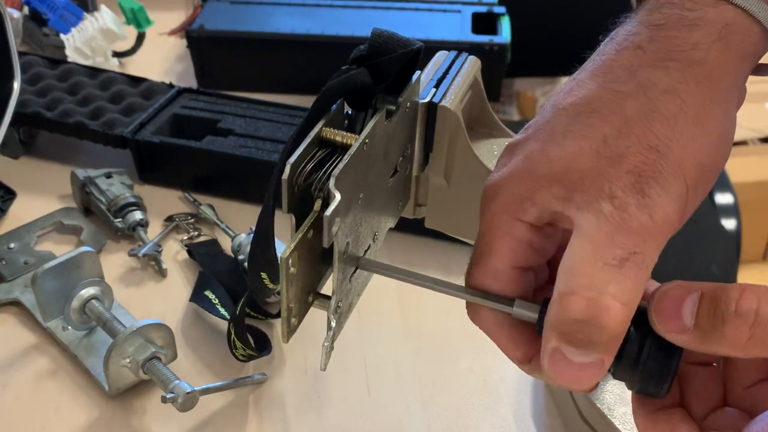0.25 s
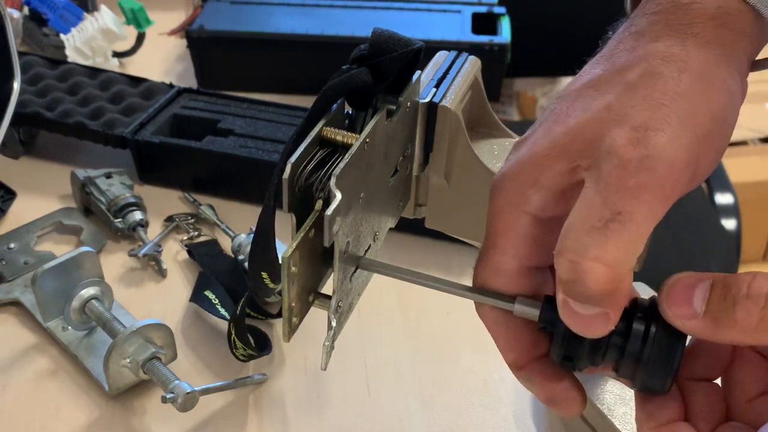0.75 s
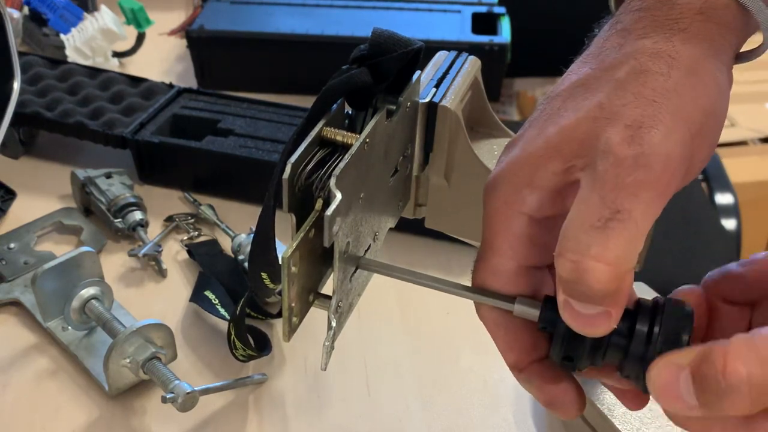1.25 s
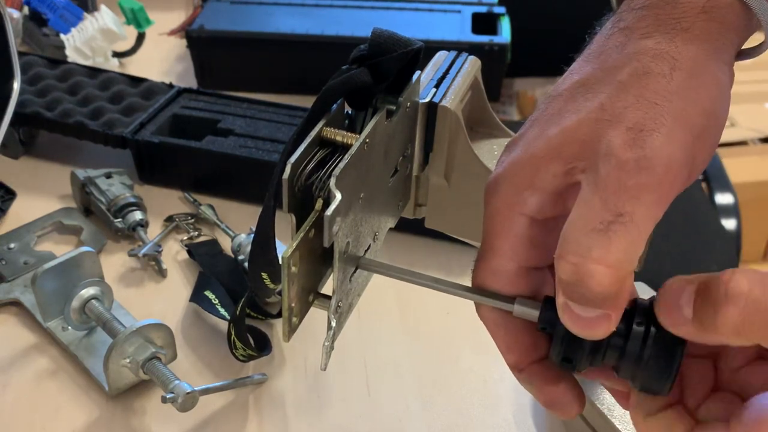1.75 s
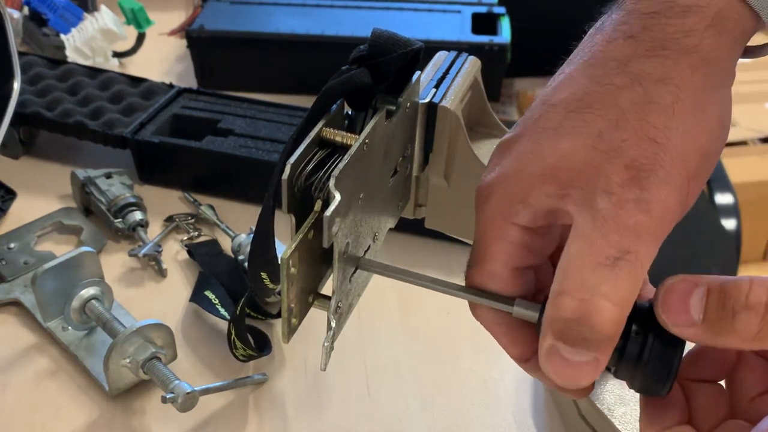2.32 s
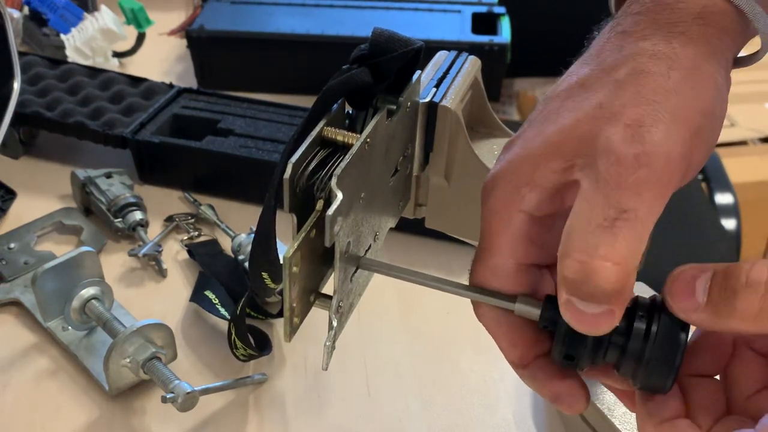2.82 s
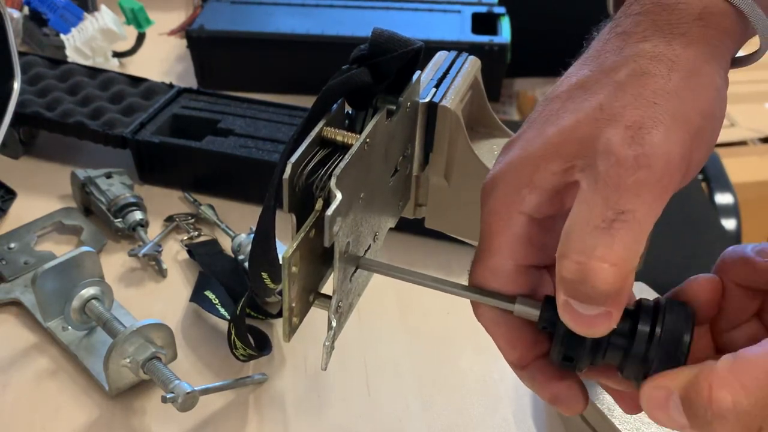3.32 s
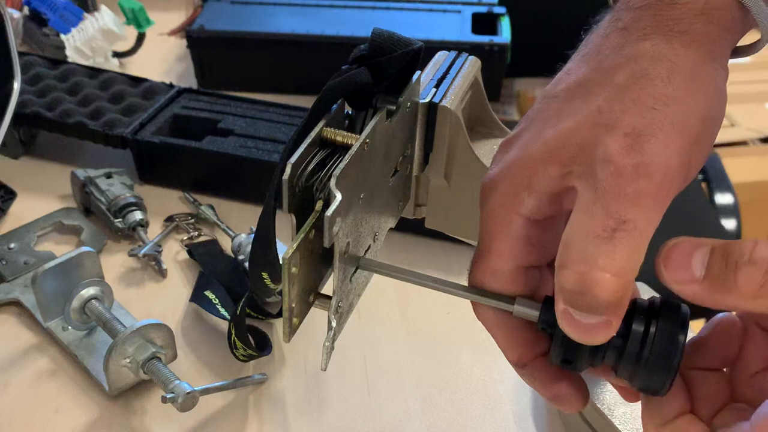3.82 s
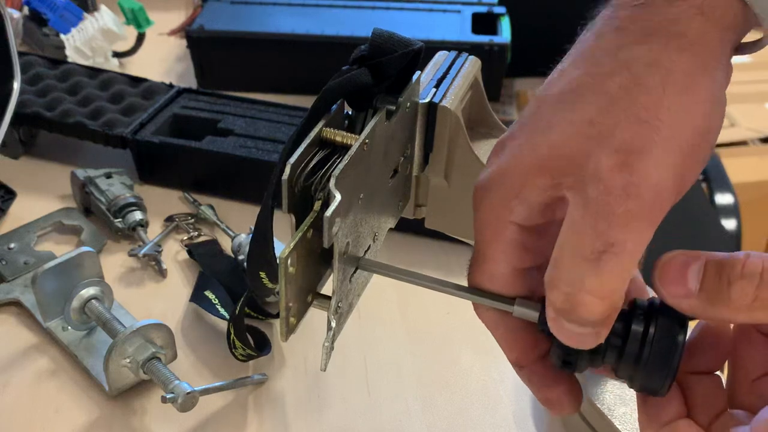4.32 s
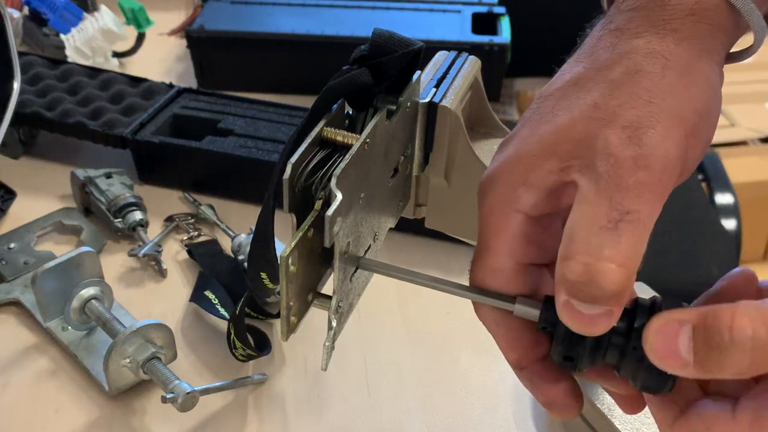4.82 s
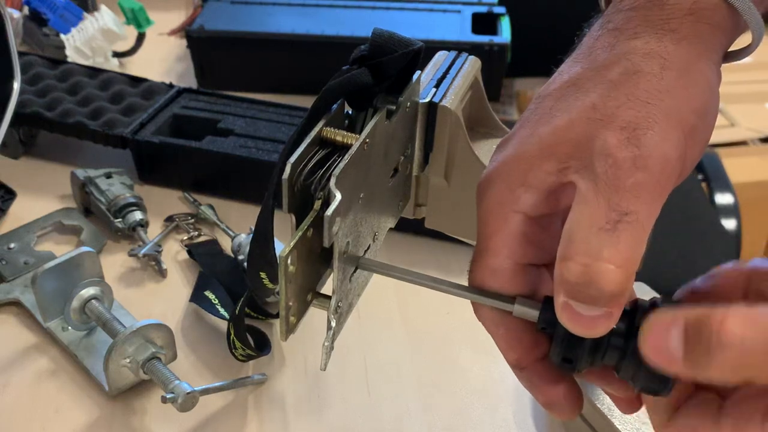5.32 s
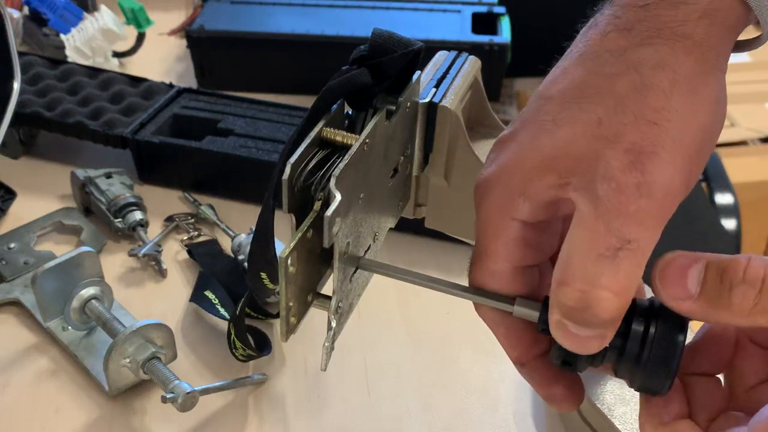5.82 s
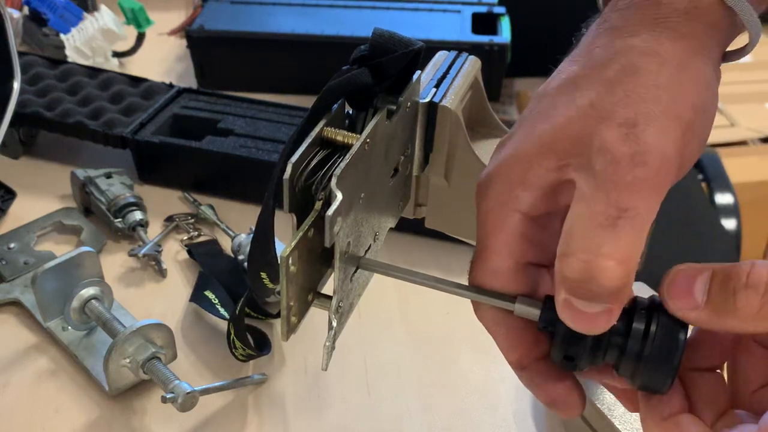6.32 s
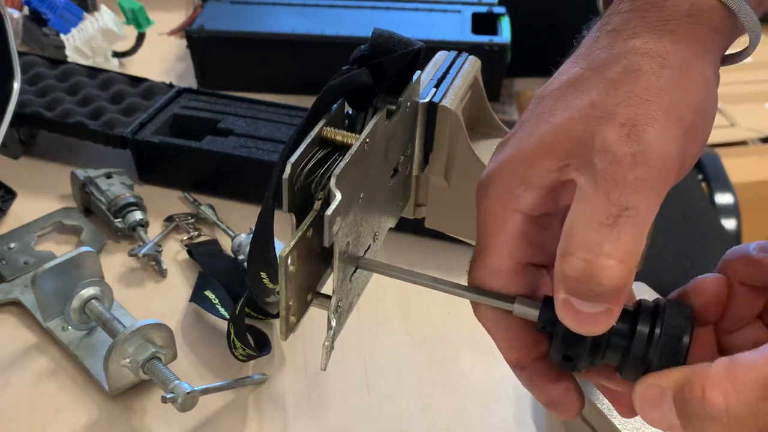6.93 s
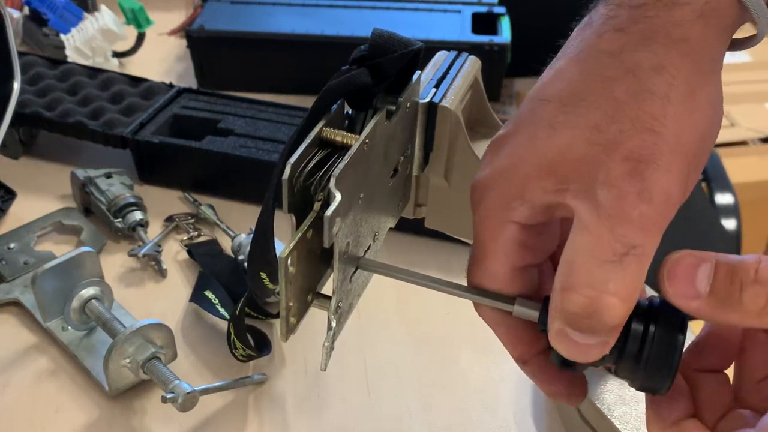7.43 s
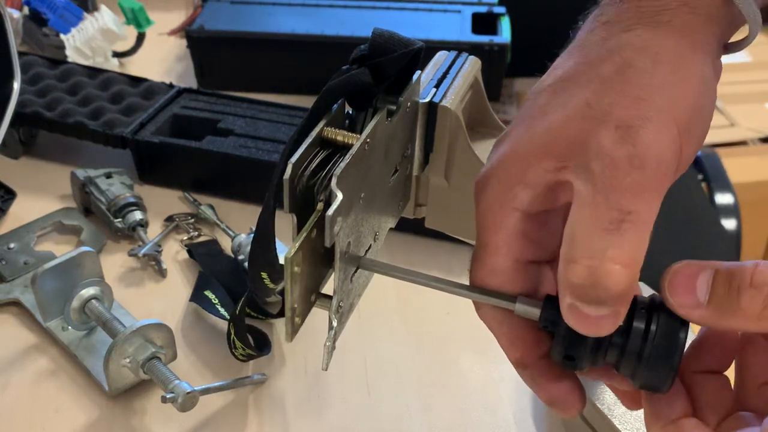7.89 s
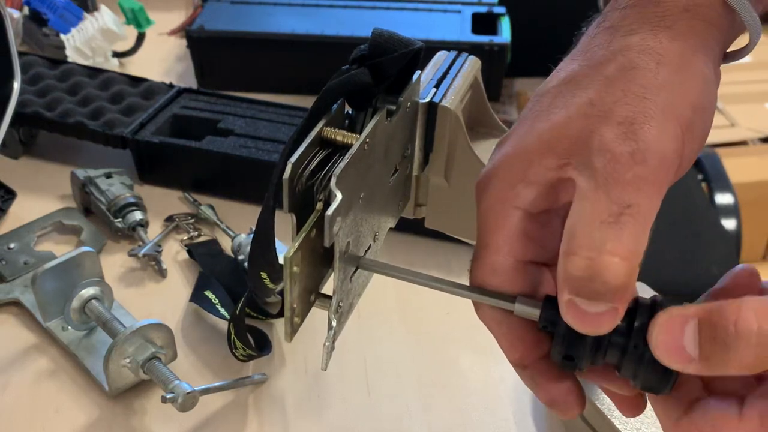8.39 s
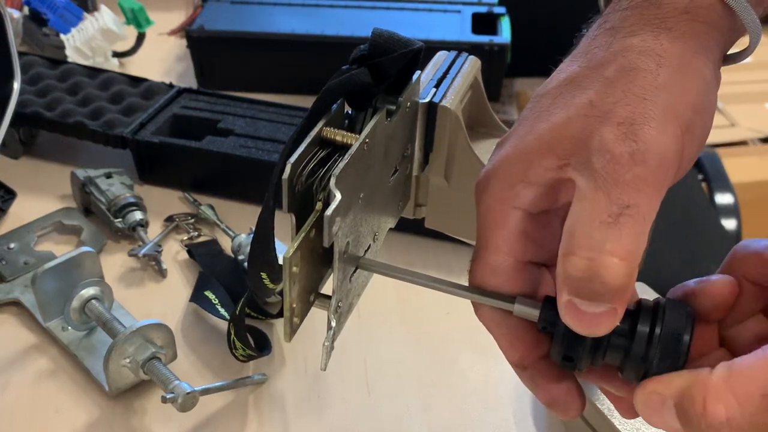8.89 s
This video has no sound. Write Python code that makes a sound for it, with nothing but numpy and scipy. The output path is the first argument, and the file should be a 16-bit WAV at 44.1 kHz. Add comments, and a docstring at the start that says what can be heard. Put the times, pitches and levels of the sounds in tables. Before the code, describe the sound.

A steel pick works a lever lock on a wooden bench, heard up close. A short scrape and a double snap open it, then soft clicks, small slides and faint finger ticks on a plastic knob fall between sharper, briefly ringing snaps. The hardest snap comes near the middle, and a soft click ends it. The bench thuds lightly under the snaps, in a quiet room with low rumble and hiss.

```python
"""A steel pick works a lever safe lock that stands open on a wooden bench, close to a two-port microphone.
It opens on a short scrape and a double snap of levers on steel and brass plates; the bench booms below.
Fingers tick and rub on the pick's knob between soft clicks and slides, then levers snap at 2.2-2.4 s.
The hardest snap lands at 4.1 s, more follow at 4.4, 5.8 and 7.6-7.9 s, and a soft click ends it at 9.1 s.
Throughout, the quiet room answers each click over a low rumble and microphone hiss."""
import sys
import numpy as np
from scipy import signal
from scipy.fft import rfft, irfft, next_fast_len
from scipy.io import wavfile

SR = 44100
rng = np.random.default_rng(int(sys.argv[2]) if len(sys.argv) > 2 else 0)


def generate_wav(sig):
    """Save sig (samples, or channels by samples) to the path in sys.argv[1] as 16-bit PCM at SR."""
    pcm = np.round(np.clip(np.atleast_2d(sig).T, -1, 1) * 32767).astype(np.int16)
    wavfile.write(sys.argv[1], SR, pcm)


N = 403515

# Metal contacts: (time [s], level at 2.8 kHz [dB], clack at 1.6 kHz [dB re level], edge at 7 kHz [dB re level],
# top at 13 kHz [dB re level], weight into the bench [dB], plate struck squarely [Hz; 0 for none, 1 or less
# wakes only the lowest plate's ring], its boost [dB])
CONTACTS = [(0.2315, -35.5, -14, -1.5, -2.5, -49.5, 529.5, 11), (0.2356, -27, -14, -7, 2, -42, 2861, 1.5),
            (0.5626, -43.5, -1, -3, -15, -44, 1250, 6.5), (1.708, -56, -3, -19, -20, -56.5, 1900, 9.5),
            (1.7233, -52.5, -5, -0.5, -26, -55.5, 4950, 8), (1.7482, -56, 2, 11, -35, -54, 7600, 7),
            (1.768, -46.5, -13, -20, -33, -51, 4550, 0), (2.1967, -22, -27.5, -1, 0, -34.5, 2669.5, 3),
            (2.404, -28.5, -8.5, -1, 6, -49, 0, 0), (2.4295, -30, -10.5, 1.5, 7, -38, 1900, 5.5),
            (2.621, -46.5, -0.5, -5, -34, -46, 921, 5), (3.633, -57, 7.5, -16, -27, -59.5, 1, -0.5),
            (3.6617, -53, 1, 4, -23, -48.5, 4130, 14), (3.6736, -49.5, -11, 4, -10, -53, 5500, 2),
            (3.7483, -50.5, 3, 5.5, 1.5, -50.5, 1700, 3), (4.0693, -33, 0, -2.5, -5.5, -60.5, 1699.5, 4),
            (4.076, -17.5, -14, -3, 0.5, -35, 681.5, 5.5),
            (4.4202, -27.5, -10.5, -8, -13.5, -36, 3100, 9.5), (5.3519, -61, -1, -26, -34.5, -58.5, 0, -1),
            (5.3653, -57.5, 3, -26, -27, -53, 0, 0), (5.4092, -44.5, -4, -2, -11, -57.5, 4950, 7.5),
            (5.81, -30.5, -5.5, 2, 14.5, -38, 0.5, 0.5), (6.0454, -51.5, -11, -8, -28, -47, 2670, 2),
            (6.2322, -47.5, 1.5, 2, -13.5, -43, 1700, 4.5), (7.056, -55.5, -1, -12.5, -22, -51, 1, 0),
            (7.091, -55, -5, 4.5, -20, -48.5, 4550, 3), (7.564, -21, -15.5, 0.5, 3, -35, 2669.5, 4.5),
            (7.5893, -32, -14.5, 0.5, 9, -36.5, 4551.5, 5), (7.868, -45.5, -12, -3, -9, -51, 1250, 18),
            (7.879, -35.5, -1.5, -2, -8, -36, 2670, 2), (9.0748, -54, 4.5, -10, -21.5, -48.5, 0, -1)]
# Tone of steel sliding on steel: (frequency [Hz], level per half octave [dB])
SCRAPE_TONE = [(300, -10.5), (700, -24), (2000, -22), (4000, -20.5), (8000, -30), (14000, -29)]
# Decay of the room: (frequency [Hz], t60 [s])
ROOM_DECAY = [(150, 0.68), (560, 0.24), (1470, 0.29), (3880, .33), (8000, 0.29), (14000, 0.15)]
BAND_EDGES_HZ = 300 * 2 ** np.arange(0, 6.1, .5)
BAND_CENTRES_HZ = np.sqrt(BAND_EDGES_HZ[1:] * BAND_EDGES_HZ[:-1])
CHATTER_S, LOCK_PAN_DB = .0008, .76   # time scale of a contact; left minus right


def amp(db):
    """Decibels to gain."""
    return 10 ** (np.asarray(db) / 20)


def pan(db):
    """Left and right gains, with the left louder by db."""
    return amp(db * np.array([[.5], [-.5]]))


def rms_one(x):
    """Scale to rms 1."""
    return x / np.sqrt(np.mean(x ** 2) + 1e-20)


def at_hz(points, hz):
    """Read a (frequency, value) curve on a log axis."""
    return np.interp(np.log(hz + 1), np.log(np.array(points)[:, 0] + 1), np.array(points)[:, 1])


def band(x, k):
    """Half-octave band k of x, at rms 1."""
    sos = signal.butter(2, BAND_EDGES_HZ[k:k + 2], "band", fs=SR, output="sos")
    return rms_one(signal.sosfilt(sos, x))


def ring(force, hz, t60):
    """One resonance: a unit click starts a decaying sine of height 1."""
    r, w = amp(-60 / (max(t60, .003) * SR)), 2 * np.pi * hz / SR
    return signal.lfilter([0, np.sin(w)], [1, -2 * r * np.cos(w), r * r], force + 1e-18)


def stereo(mid, side):
    """Mid and side to left and right."""
    return np.array([mid + side, mid - side])


def blow_db(hz):
    """Level of every contact at one pitch: weight sets the knock, a squarely struck plate stands out."""
    anchors_hz, levels = [700, 1600, 2800, 7000, 13000], []
    for _, db, clack, edge, top, weight, plate_hz, boost_db in CONTACTS:
        tone = list(zip(anchors_hz, [weight - 10.5, db + clack, db, db + edge, db + top]))
        octaves_off = np.log2(hz / max(plate_hz, 1))
        levels.append(at_hz(tone, hz) + .51 * boost_db * np.exp(-(octaves_off / .087) ** 2))
    return np.array(levels)


def lever_ring():
    """Each contact is a short chatter that strikes every mode of the lock at a moment of its own."""
    # Modes of the plates and levers: (frequency [Hz], level [dB], t60 [s])
    modes = [(720, -23, .03), (1140, -23, .03), (1840, -11.5, .04), (1800, -12, 0.028), (2265, -17, 0.027),
             (2720, -4.5, 0.019), (2810, -4.5, 0.041), (3299, -9.5, 0.028), (4600, -13.5, .03),
             (4910, -9, 0.019), (5300, -12, 0.07), (6440, -19.5, 0.0067), (6770, -8, 0.028),
             (8050, -10, 0.017), (7530, -3.5, 0.025), (8350, 2.5, 0.026), (9490, 0.5, 0.019),
             (9200, -1.5, 0.06), (11600, -1.5, 0.013), (11260, -1.5, 0.02), (12700, -10, 0.039),
             (12750, -6.5, 0.03), (13900, -11, 0.013), (14750, 1.5, .02), (15100, -9, .012)]
    hz, db, t60 = np.transpose(modes)[:, :, None]
    delays = CHATTER_S * rng.gamma(2, .7, (len(CONTACTS), len(modes)))
    scatter_db = rng.normal(0, 1, delays.shape)
    gains = amp(np.transpose([blow_db(f) for f in hz[:, 0]]) + db[:, 0] - 2.5 + scatter_db)
    out = np.zeros((2, N))
    for (time, *_), delay, gain in zip(CONTACTS, delays, gains):
        t = np.maximum(np.arange(2600) / SR - delay[:, None], 0)
        partials = amp(-60 * t / t60) * np.sin(2 * np.pi * hz * t)
        i = round(time * SR)
        out[:, i:i + t.shape[1]] += pan(LOCK_PAN_DB) * (gain @ partials)
    return out


def lever_crack():
    """A faint swell of noise leads into each sharp crack, which lasts longer below 2.8 kHz."""
    # Tone of the blow, too dense for single modes: (frequency [Hz], level [dB])
    crack_tone = [(400, -12.5), (700, -9.5), (1500, -9), (2700, -9), (4000, -17.5), (8000, -2.5),
                  (10400, -12), (13500, -7), (16500, -14)]
    lead_samples = 900
    t = np.arange(-lead_samples, 400) / SR
    lead_in_swell = amp(-18) * np.exp(-np.abs(t) / .0035)
    out, white = np.zeros(N), rng.standard_normal((2, N))
    for k, hz in enumerate(BAND_CENTRES_HZ):
        age = np.maximum(t, 0) / (CHATTER_S * np.sqrt(max(2800 / hz, 1)))
        snap = age * np.exp(1 - age)
        envelope = np.zeros(N)
        for (time, *_), gain in zip(CONTACTS, amp(blow_db(hz) + at_hz(crack_tone, hz))):
            i = round(time * SR) - lead_samples
            envelope[i:i + len(t)] += gain * (lead_in_swell + snap)
        out += envelope * band(white[k % 2], k)
    return pan(LOCK_PAN_DB) * out


def slide_envelopes():
    """Scrape and bench shake: each slide sets in fast, grows under load until the pick seats, then fades."""
    # Slides of the pick: (end [s], length [s], scrape [dB], bench shake [dB])
    slides = [(0.004, 0.053, -51.5, -49), (0.561, .014, -63, -60.5), (1.771, 0.072, -60.5, -48.5),
              (2.404, .012, -60, -61), (3.674, .045, -56.5, -47.5), (3.748, .012, -60.5, -50.5),
              (4.416, .012, -58, -70), (5.412, 0.037, -55, -44), (6.238, .012, -60, -62),
              (7.085, 0.031, -53, -44), (7.866, .012, -59.5, -62), (9.092, 0.023, -54, -43)]
    onset, growth, scrape_fade, shake_fade = 1200, 65, 1300, 120   # dB per second
    scrape, shake, t = np.zeros(N), np.zeros(N), np.arange(N) / SR
    for end, length, scrape_db, shake_db in slides:
        before, after = np.maximum(end - t, 0), np.maximum(t - end, 0)
        build_db = -growth * before - onset * np.maximum(before - length, 0)
        scrape += amp(scrape_db + build_db - scrape_fade * after)
        shake += amp(shake_db + build_db - shake_fade * after)
    return scrape, shake


def pick_scrape(slide):
    """Rough steel on steel: dense, uneven micro-clicks."""
    catches = rng.random(N) < 3000 / SR   # about 3000 a second
    strength = amp(9.8 * np.minimum(rng.exponential(1, N), 4))
    grit = catches * strength * rng.choice([-1, 1], N)
    return slide * sum(amp(at_hz(SCRAPE_TONE, hz)) * band(grit, k) for k, hz in enumerate(BAND_CENTRES_HZ))


def tail(slide, hz, t60, extra_db=0):
    """Ring-out envelope at one pitch: it fills with the energy of blows and slides, then drains."""
    # Tone of the room's answer: (frequency [Hz], level [dB])
    tail_tone = [(300, -13), (700, -9), (1500, -16.5), (2700, -26.5), (4500, -24.5), (8000, -22),
                 (10400, -29), (13500, -28.5), (16500, -42)]
    times, levels_db = np.transpose(CONTACTS)[:2]
    send_db = -2 + .0781 * (-30 - levels_db)   # softer contacts leave relatively more tail
    power = (slide * amp(-26 + at_hz(SCRAPE_TONE, hz))) ** 2
    power[(times * SR).astype(int)] += amp(blow_db(hz) + send_db + at_hz(tail_tone, hz) + extra_db) ** 2
    drain, fill = amp(-120 / (t60 * SR)), np.exp(-1 / (.012 * SR))   # 12 ms rise
    power = signal.lfilter([1 - fill], np.convolve([1, -drain], [1, -fill]), power + 1e-24)
    return np.sqrt(np.maximum(power, 0))


def plate_rattle(slide):
    """Rattling parts keep the plates ringing unsteadily; each blow wakes another mix of them."""
    # Plate resonances: (frequency [Hz], width [Hz], level [dB re tail])
    plates = [(530, 40, -10), (680, 40, -5), (920, 60, -4), (1250, 90, -4), (1700, 90, 0), (1900, 90, -4),
              (2200, 80, -7), (2670, 80, -2), (2860, 100, -2), (3100, 80, -7), (3350, 90, -6),
              (4130, 120, -5), (4550, 110, -3), (4950, 150, -4), (5500, 200, -5), (6900, 200, -6),
              (7900, 200, -6)]
    out, white = np.zeros(N), rng.standard_normal(N)
    woken_db = rng.normal(0, 2, (len(CONTACTS), len(plates)))
    for blow, (*_, plate_hz, boost_db) in enumerate(CONTACTS):
        if plate_hz:
            nearest = np.argmin(np.abs(np.array(plates)[:, 0] - plate_hz))
            woken_db[blow, nearest] = boost_db
    for k, (hz, width_hz, db) in enumerate(plates):
        shimmer = rms_one(ring(white, hz, t60=np.log(1000) / (np.pi * width_hz)))
        out += amp(db) * tail(slide, hz, 1.1 * at_hz(ROOM_DECAY, hz), woken_db[:, k]) * shimmer
    return out


def bench_boom(shake):
    """Contacts reach the wood as slightly late pushes; slides shake it at random."""
    # Bench top modes: (frequency [Hz], blow gain [dB], slide gain [dB], t60 [s], left minus right [dB])
    modes = [(61, -9, -1.5, 0.19, 4), (93.8, -1, 2.5, 0.44, 3), (121.4, -1.5, 2.5, 0.52, 3.5),
             (165, -4, -8, .35, 4), (218.3, -3, -13.5, 0.33, -2), (266.4, -9, -10, 0.23, 0.5),
             (328, -12, -14, 0.033, -6.5), (418, -5, -7, 0.22, 3.5), (636, -13, -10, 0.13, -0.5)]
    out, tremor = np.zeros((2, N)), amp(-36) * shake * rng.standard_normal(N)
    arrivals = [round((time + .0053) * SR) for time, *_ in CONTACTS]
    weight_db = np.array(CONTACTS)[:, 5] - 6.5
    scatter_db = rng.normal(0, 2, (len(CONTACTS), len(modes)))
    for k, (hz, push_db, shake_db, t60, pan_db) in enumerate(modes):
        force = amp(shake_db) * tremor
        force[arrivals] += amp(weight_db + push_db + scatter_db[:, k])
        out += pan(pan_db) * ring(force, hz, t60) * (-1) ** k
    return out


def finger_ticks():
    """Fingers shift on the plastic knob: short grainy touches in one damped resonance, with a faint echo."""
    # Dull ticks: (time [s], peak [dB], pitch [Hz])
    ticks = [(0.6567, -55, 1360), (1.068, -54.5, 1700), (1.4806, -63.5, 960), (3.0357, -62.5, 1654),
             (4.0395, -62, 1980), (4.7544, -66, 2100), (5.1266, -66, 2300), (6.5151, -64.5, 2160),
             (6.5275, -62, 2180), (6.892, -65.5, 2124), (7.438, -58, 1840), (8.1968, -60, 2095),
             (8.6895, -66, 2250)]
    out, t = np.zeros((2, N)), np.arange(3000) / SR
    faint_ticks = [(when * (N - len(t)) / SR, -77 + 6 * force, 1300 + 1100 * pitch)
                   for when, force, pitch in rng.random((8, 3))]
    touch = np.exp(-t / .0012) + .1 * np.exp(-t / .035)
    for time, db, hz in ticks + faint_ticks:
        tick = ring(touch * rng.standard_normal(len(t)), hz, t60=.0059)
        i = round(time * SR)
        out[:, i:i + len(t)] += amp(db) * pan(1.5) * tick / np.abs(tick).max()
    return out


def finger_rubs():
    """Skin on plastic: a soft swell of noise in one broad resonance."""
    # Strokes over the knob: (middle [s], length [s], peak [dB], pitch [Hz])
    rubs = [(1.22, .05, -75.5, 1700), (1.323, .05, -75.5, 3200), (1.496, .015, -69, 2200),
            (2.047, 0.025, -74, 2230), (3.023, .04, -73.5, 1800), (3.199, .07, -74, 1900),
            (3.311, .05, -74, 3200), (3.42, .06, -73, 2200), (5.0, .03, -75, 947), (6.8, .1, -76, 2500),
            (8.174, .03, -73, 1860), (8.62, .03, -74, 1320)]
    out, t = np.zeros(N), np.arange(-6000, 6000) / SR
    for time, length, db, hz in rubs:
        swell = np.exp(-(2 * t / length) ** 2)
        rub = ring(swell * rng.standard_normal(len(t)), hz, t60=.0032)
        i = round(time * SR) - len(t) // 2
        out[i:i + len(t)] += amp(db) * rub / np.abs(rub).max()
    return out


def microphone_ports(near):
    """The two ports hear the near lock with phase and level offsets that depend on pitch."""
    # Phase between the ports: (frequency [Hz], left lead [rad])
    phase = [(0, 0), (860, .2), (1400, .6), (1800, -1), (2240, .6), (3360, -.2), (4300, 1.2), (5200, -1.6),
             (6800, .6), (8300, -1.7), (11300, -4.2), (13000, -5.2), (14400, -7.2), (15100, -7.5),
             (16400, -7.5)]
    # Balance between the ports: (frequency [Hz], left minus right [dB])
    balance = [(300, -2), (600, 4), (1200, 3), (2800, 3.5), (5000, -4.5), (8000, 2.1), (14000, 0.1)]
    size = next_fast_len(N)
    hz = np.arange(size // 2 + 1) * SR / size
    turn = np.interp(hz, *np.transpose(phase)) * np.array([[.5], [-.5]])
    return irfft(rfft(near, size) * np.exp(1j * turn) * pan(at_hz(balance, hz)), size)[:, :N]


def room_answer(slide):
    """Walls and loose parts answer with noise that dies band by band."""
    # Stereo width of the room: (frequency [Hz], side [dB re mid])
    width = [(100, -10.5), (300, 0), (1000, 2), (4000, 5), (8000, 0), (14000, -5)]
    out, white = np.zeros((2, N)), rng.standard_normal((2, 2, N))
    for k, hz in enumerate(BAND_CENTRES_HZ):
        mid, side = band(white[k % 2], k)
        out += tail(slide, hz, at_hz(ROOM_DECAY, hz)) * stereo(mid, amp(at_hz(width, hz)) * side)
    return out


def noise_bed(tone):
    """Stereo noise that follows a tone curve and is silent outside it; mid at rms 1."""
    # Stereo width of the noise floor: (frequency [Hz], side [dB re mid])
    width = [(30, -22), (100, -15), (300, -13), (1000, -2.5), (4000, 0.5), (8000, -4), (14000, -2)]
    size = next_fast_len(N)
    hz = np.arange(size // 2 + 1) * SR / size
    gain = amp(at_hz(tone, hz)) * (hz >= tone[0][0]) * (hz <= tone[-1][0])
    white = rfft(rng.standard_normal((2, size)))
    mid, side = irfft(white * [gain, gain * amp(at_hz(width, hz))], size)[:, :N]
    return stereo(mid, side) / np.sqrt(np.mean(mid ** 2))


def rumble_and_hiss():
    """A low rumble that swells slowly, and steady microphone hiss."""
    # Tone of the rumble: (frequency [Hz], level [dB])
    rumble_tone = [(12, -40), (20, -12), (48, -1), (64, -2), (77, -2), (84, -15.5), (86, -19.5), (92, -22),
                   (108, -13), (125, -10.5), (137, -13), (151, -30), (173, -22.5), (199, -29.5), (230, -33),
                   (300, -61), (510, -120)]
    # Tone of the hiss: (frequency [Hz], level [dB])
    hiss_tone = [(130, -29), (220, 0), (259, -3.5), (305, 2), (352, -9), (407, -3.5), (662, -13.5),
                 (2140, -21), (2570, -22.5), (4300, -23), (5900, -27.5), (7200, -24), (8160, -24),
                 (9420, -23), (10500, -47), (11500, -26), (13800, -23.5), (16500, -42)]
    # Rise and fall of the rumble: (time [s], level [dB])
    swell_points = [(0, 3.5), (1.4, 0.74), (2.8, -3), (4.2, 2.5), (5.4, -2), (6.3, 1.5), (7, -4.5),
                    (7.7, 7), (8.4, -0.7), (9.15, 4)]
    swell = amp(np.interp(np.arange(N) / SR, *np.transpose(swell_points)))
    return amp(-57.5) * swell * noise_bed(rumble_tone) + amp(-78) * noise_bed(hiss_tone)


def scene():
    """Lock and fingers up close, the bench beneath, the room and noise floor behind."""
    slide, shake = slide_envelopes()
    metal = lever_ring() + lever_crack() + pick_scrape(slide) + plate_rattle(slide)
    fingers = finger_ticks() + finger_rubs()
    return microphone_ports(metal + fingers) + bench_boom(shake) + room_answer(slide) + rumble_and_hiss()


def record(dry):
    """A notch in the microphone's treble, then a steep cut of the very top."""
    notch_hz, notch_width_hz, stop_hz = 10560, 1400, 16800
    notched = signal.lfilter(*signal.iirnotch(notch_hz, notch_hz / notch_width_hz, SR), dry)
    return signal.sosfilt(signal.cheby2(14, 70, stop_hz, fs=SR, output="sos"), notched)


dry = scene()
out = record(dry)
generate_wav(out)
```